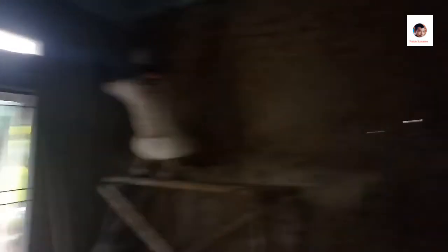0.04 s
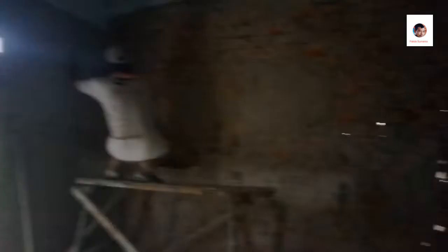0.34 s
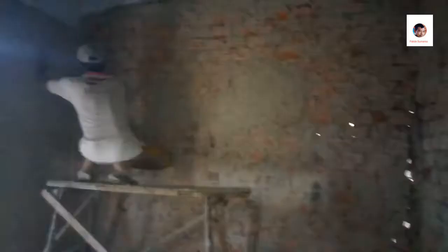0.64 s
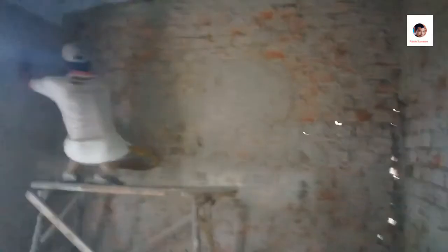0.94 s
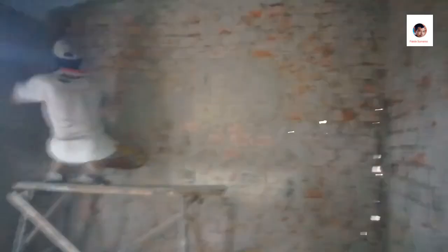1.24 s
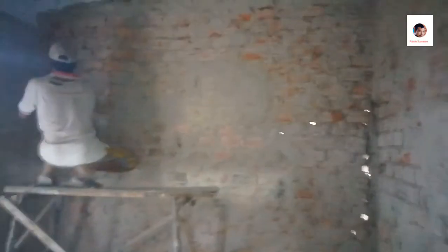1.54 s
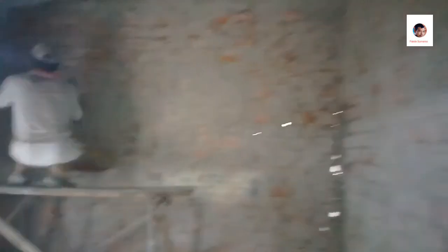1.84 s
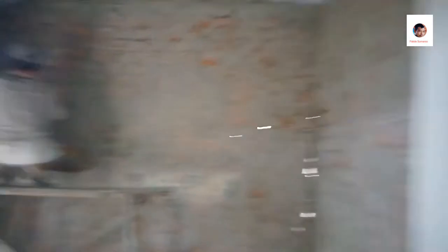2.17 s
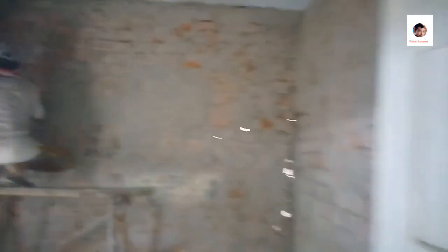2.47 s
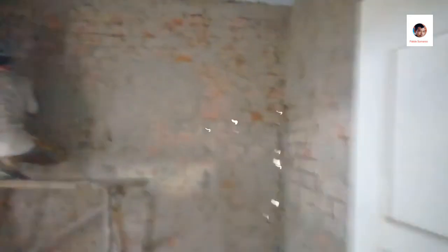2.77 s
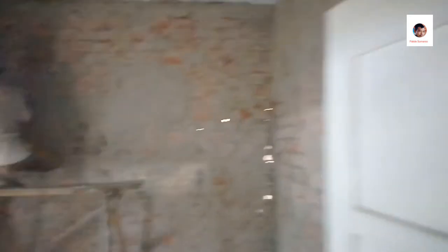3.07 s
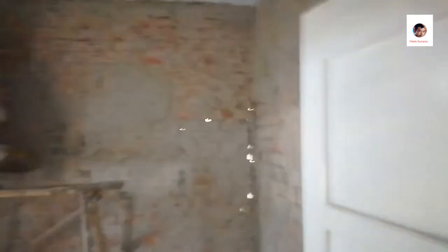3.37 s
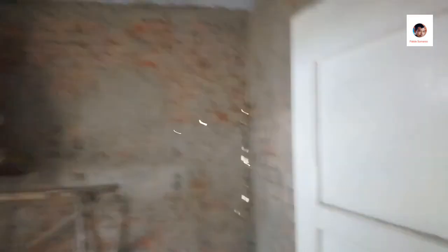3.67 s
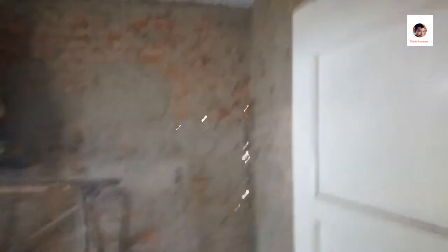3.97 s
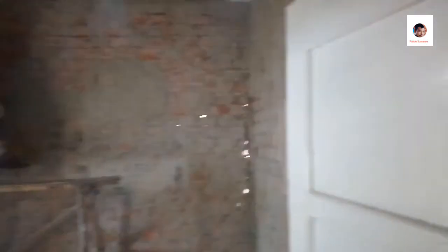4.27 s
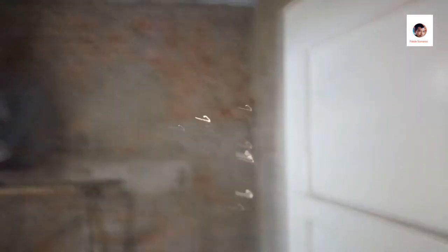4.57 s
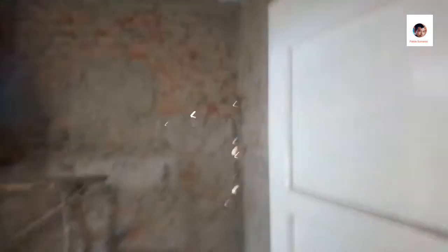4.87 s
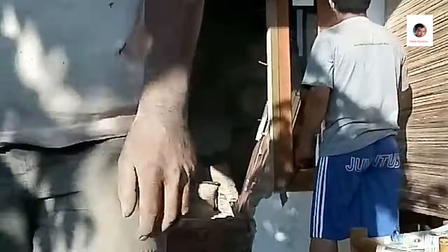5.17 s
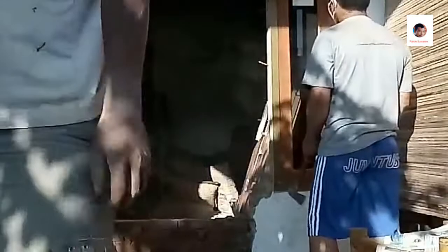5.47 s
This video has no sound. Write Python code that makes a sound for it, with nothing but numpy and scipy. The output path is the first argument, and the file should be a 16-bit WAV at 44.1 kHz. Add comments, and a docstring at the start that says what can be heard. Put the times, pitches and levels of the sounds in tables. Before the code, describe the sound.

Old plaster is being hammered off a brick wall in a bare, reverberant room, heard through dull microphones over soft room noise. Crunching, thudding hammer blows land at about 0.2 and 0.7 seconds, with louder ringing clanks on a steel chisel at 0.35 and 1.2. In a short pause, chips tick down around 1.6. From 2.0 to 4.7 the wall blows return roughly every 0.4 seconds, each with a low boom, joined by chisel strikes at 2.8, 3.7 and 4.5. Grit trickles in small spills between them, and a loose piece of masonry clacks at 4.1. At 4.8 the sound drops out for an instant. One more heavy, booming chisel blow follows at 4.9, then scattered chips land over a quieter rumble and low hum. A faint, thin whistle wavers upward from 5.1 until the end, around 5.6 seconds.

```python
"""A bare room, heard through a dull microphone pair: old plaster is being knocked off a brick wall.
Hammer blows crack the plaster and make the wall thud and boom. Between them, louder blows on a steel
chisel ring and swell; a loose piece clacks, chips land and grit trickles down.
A limiter ducks the loud blows. The sound drops out for a moment; one more heavy blow follows,
over a quieter background with a low hum and a faint rising whistle."""
import sys
import numpy as np
from scipy import signal
from scipy.fft import rfft, irfft, next_fast_len
from scipy.io import wavfile
from scipy.ndimage import uniform_filter1d, minimum_filter1d

SR = 44100
rng = np.random.default_rng(int(sys.argv[2]) if len(sys.argv) > 2 else 0)


def int16_out(signal):
    """Quantize to a 16-bit WAV file."""
    q = np.round(np.clip(np.atleast_2d(signal).T, -1, 1) * 32767)
    wavfile.write(sys.argv[1], SR, q.astype(np.int16))


N = 247709
SIZE = 32768  # samples in one impact with its tail
LONG = next_fast_len(N + SIZE, True)
T, AGE = np.arange(N) / SR, np.arange(SIZE) / SR  # seconds into the scene, and into one impact
HZ, LONG_HZ = np.fft.rfftfreq(SIZE, 1 / SR), np.fft.rfftfreq(LONG, 1 / SR)
DROPOUT_FROM_S, DROPOUT_TO_S = 4.831, 4.861

# resonances of the brick wall: f/Hz, width/Hz, level/dB
WALL_MODES = [(69.5, 15, -1.5), (125, 5.8, 3.5), (201, 65, 0.5), (281, 24, 1), (352.7, 4.2, 5.5),
              (549, 27, -3)]
# reverberation of the room by band: f/Hz, t60/s, build-up/s
ROOM_BANDS = [(60.4, 0.82, 0.054), (125, 0.9, 0.02), (269, 0.63, 0.0013), (570, 0.7, 0.00085),
              (1300, 0.72, 0.0034), (2840, 0.68, 0.017), (5600, 0.73, 0.0096), (8600, 0.3, 0.0092)]


def wall_blows(room, plate_q=14, thud_hz=105, crack_hz=4800):
    """The hammer cracks and crushes plaster, the loose plate clacks and the wall thuds and booms."""
    # blows: t/s, force/dB, hardness/(dB/octave), hollow knock/dB, thud/dB, snap/dB, crunch/dB,
    # low, middle and high plate f/Hz, plate/dB, surface crack/dB, boom f/Hz, boom/dB, after-ring/dB
    blows = [ (0.2, -15, 0.2, -1.5, 1, 1, 4.3, 2050, 4000, 5150, 7, -19, 72.1, -13.5, -24.5),
             (0.7407, -14, 0.8, 0, -2, -5, 7, 1100, 1600, 4500, 7, -12, 134.7, -20, -19),
             (2.0092, -17, -1.4, 1.5, -5.5, -10, 1.5, 870, 1790, 5500, 6, -14.5, 220, -21, -23.5),
             (2.3300, -18, 0.1, -1.5, 1, 1, 5, 1250, 2200, 6600, 6, -15, 112, -15, -17),
             (2.7731, -15.5, -1.6, 2.5, 6, 2, 5, 275, 2160, 6300, 7.7, -12, 97, -27, -37),
             (3.1300, -19.5, 1, 1, 0.5, 1.5, 5.8, 2100, 6400, 6800, 6.5, -12.5, 71, -17.5, -33.5),
             (3.483, -20, 0.84, -1.5, -3, 6.5, 2.8, 806, 1950, 3720, 9.8, -14, 68.3, -19, -30),
             (3.8500, -18.5, -1.4, 3.5, -1.5, 8, 5, 810, 1750, 4260, 5.9, -29, 63, -20, -34),
             (4.2379, -18.5, -1.2, 3, 1, 8, 7.5, 660, 4230, 6500, 8, -7, 69, -21, -33),
             (4.6620, -19.5, -0.15, 3.5, 2, 11, 6, 1236, 2120, 4500, 5.9, -17, 69, -18.5, -36)]
    # colour of an average blow on plaster: f/Hz, level/dB
    plaster_tone = [(80, 1), (200, 1.5), (460, -8.5), (1000, -12.5), (2000, -13.8), (2900, -20),
                    (3700, -19), (5600, -20.3), (8000, -18), (10500, -14), (15000, -21)]
    # broad ringing of the plaster coat: f/Hz, width/Hz, level/dB
    coat_modes = [(1450, 800, 1), (2200, 300, -1), (4250, 380, 2), (5200, 300, -2), (6700, 400, 0)]
    out, wall_db = np.zeros((2, N)), ringing(WALL_MODES)
    for (s, force_db, hardness, knock_db, thud_db, snap_db, crunch_db,
         *plate_hz, plate_db, crack_db, boom_hz, boom_db, ring_db) in blows:
        plate = [(hz, hz / plate_q, plate_db) for hz in plate_hz]
        thud = thud_db / (1 + (HZ / thud_hz) ** 4)
        modes_db = wall_db + ringing(coat_modes + plate + masonry_modes())
        colour = causal(spot_tone(plaster_tone, hardness, knock_db) + thud + modes_db)
        blow = impact(room, colour, snap_db, snap_s=0.0013,
                      crush_db=crunch_db, crush_s=0.017, window_s=0.12)
        crack = amp(crack_db) * tick(crack_hz, octaves=0.98, contact_s=0.0017)
        bass = amp(boom_db) * boom(boom_hz) + amp(ring_db) * after_ring()
        place(out, s, amp(force_db) * blow + crack + bass)
    return out


def chisel_blows(room, main_db=11, main_width_hz=140):
    """Steel on steel: a tick, clanking modes and a thin ring over the swelling knock of the brick."""
    # blows: t/s, force/dB, hardness/(dB/octave), hollow knock/dB, swell/s, bloom/dB, snap/dB,
    # clank/dB, main clank f/Hz, tick f/Hz, tick/dB, long ring/dB, wall boom/dB
    blows = [ (0.3500, -12, 2.2, 1, 0.001, -5, 8, 2.5, 2850, 6030, -9, -48, -30.5),
             (1.1802, -10, -0.8, 6.5, 0.00077, -4.5, 9.5, 0, 3050, 3560, -8, -14, -34),
             (2.8166, -10.5, 1.24, 1, 0.015, -4, -5, 5.5, 3450, 3400, -5.5, -21, -45),
             (3.6530, -9.8, -0.8, 0.5, 0.0028, -10.5, 9, 2.5, 1790, 3530, -4.5, -14, -46),
             (4.4880, -11.5, 0.2, 2.5, 0.004, -2, 2, 4, 1820, 3570, -11, -17, -35),
             (4.9110, -12.7, 0.2, 6, 0.00052, -11, 4, -6.5, 6360, 3500, -24, -45, -20.5)]
    # colour of an average blow on the chisel: f/Hz, level/dB
    chisel_tone = [(80, -0.5), (130, -2), (230, 2), (460, -2.8), (1000, -7), (1700, -14.5), (2300, -17.5),
                   (3300, -15.5), (4500, -18), (5800, -16), (10000, -16)]
    # resonances of the chisel: f/Hz, width/Hz, level/dB
    steel_modes = [(1790, 35, 10.5), (2690, 65, 12), (2790, 60, 7), (3050, 65, 9), (3200, 60, 4),
                   (3515, 90, 7), (3700, 200, 4), (4000, 120, 2), (5450, 200, 1), (5880, 300, 4),
                   (6080, 160, 4)]
    out, wall_db = np.zeros((2, N)), ringing(WALL_MODES)
    for (s, force_db, hardness, knock_db, swell_s, bloom_db, snap_db,
         clank_db, main_hz, tick_hz, tick_db, ring_db, boom_db) in blows:
        modes = steel_modes + [(main_hz, main_width_hz, main_db)]
        clank = [(hz, width, db + clank_db) for hz, width, db in modes]
        modes_db = wall_db + ringing(clank + masonry_modes())
        colour = causal(spot_tone(chisel_tone, hardness, knock_db) + modes_db)
        blow = impact(room, colour, snap_db, snap_s=0.00098,
                      crush_db=-14, crush_s=0.13, window_s=0.063, bloom=amp(bloom_db))
        knock = amp(force_db) * blow * rise(swell_s)
        contact = amp(tick_db) * tick(tick_hz, octaves=0.17, contact_s=0.0015)
        ring = amp(ring_db) * shank_ring()
        place(out, s, knock + contact + ring + amp(boom_db) * boom(hz=112, swell_s=0.078))
    return out


def impact(room, colour, snap_db, snap_s, crush_db, crush_s, window_s, grit_db=4, bloom=0):
    """A snap, a gritty crush and the spot's own reflections, at unit RMS over the first window_s."""
    bands, decay = room
    start = rng.integers(N)
    reflections = bands[:, :, start:start + SIZE]
    grit = unit(amp(grit_db * wander(SIZE, 64)))  # grains break in clumps
    crush = amp(crush_db) * grit * np.exp(-AGE / crush_s) * rise(snap_s)
    contact = amp(snap_db) * pulse(snap_s) + crush
    hz = np.array(ROOM_BANDS)[:, :1]
    direct = hz ** 2 / (hz ** 2 + 630 ** 2)  # bass reaches the microphones mostly by way of the room
    # the low-mid knock of a heavy blow swells and holds briefly
    swell = bloom * bell(hz, 443, octaves=0.65) * pulse(0.096) ** 2
    envelopes = np.sqrt(decay ** 2 + swell ** 2 + (direct * contact) ** 2)
    response = np.einsum('bcn,bn->cn', reflections, envelopes)
    sound = irfft(rfft(response) * colour)
    return sound / np.sqrt(np.mean(sound[:, :round(window_s * SR)] ** 2))


def spot_tone(shape, hardness, knock_db, tilt_from_hz=370, tilt_to_hz=3400):
    """The colour of one blow in dB: a hard spot is brighter, a hollow one knocks."""
    octaves = np.log2(np.clip(HZ, tilt_from_hz, tilt_to_hz) / tilt_from_hz)
    hollow = bell(HZ + 1, 481, octaves=0.71)
    return curve(shape, HZ) + hardness * octaves + knock_db * hollow


def masonry_modes(count=14, q=60, db=3):
    """Every spot of masonry has a few narrow resonances of its own."""
    return [(hz, hz / q, db) for hz in np.geomspace(500, 7000, count) * rng.uniform(0.9, 1.1, count)]


def tick(hz, octaves, contact_s):
    """Two hard things meet: a burst of a few milliseconds, straight to the microphones."""
    noise = rfft(rng.standard_normal((2, SIZE)))
    return unit(irfft(noise * bell(HZ + 1, hz, octaves))) * pulse(contact_s)


def boom(hz, swell_s=0.033):
    """The wall's low mode swells after the blow and is soon damped."""
    return pulse(swell_s) ** 2 * np.sin(2 * np.pi * (hz * AGE + rng.random()))


def after_ring(build_s=0.038, t60_s=0.73):
    """The wall's low modes build up and hum on after the knock."""
    # lingering modes of the wall: f/Hz, level/dB
    low_modes = [(88, -3), (127, 0), (203, -2)]
    hum = sum(amp(db) * np.sin(2 * np.pi * (hz * rng.uniform(0.97, 1.03) * AGE + rng.random()))
              for hz, db in low_modes)
    return hum * rise(build_s) * die_away(t60_s)


def shank_ring(hz=5301, beat_hz=17.5, beat_depth=0.65, build_s=0.082, t60_s=0.64):
    """The chisel's thin ring builds up; a pair of close partials beats as it dies."""
    turns = hz * AGE + rng.random((2, 1))
    pair = np.sin(2 * np.pi * turns) - beat_depth * np.sin(2 * np.pi * (turns + beat_hz * AGE))
    return unit(pair) * rise(build_s) * die_away(t60_s)


def clack(room, s=4.1437, body_db=-15, contact_db=-10):
    """A hard, loose piece of masonry is struck and rings briefly, with no boom from the wall."""
    # overall colour of the piece: f/Hz, level/dB
    piece_tone = [(100, -11), (400, -5), (900, 0.5), (2500, -3), (5000, -5.5), (6400, -3.5), (7800, -13),
                  (11000, -20.5)]
    # its resonances: f/Hz, width/Hz, level/dB
    piece_modes = [(717, 52, 10), (1060, 23, 10), (1347, 45, 11.5), (1555, 35, 11), (2310, 91, 12.5),
                   (2844, 85, 13), (3780, 140, 11.5), (4460, 70, 15), (5860, 110, 10)]
    out = np.zeros((2, N))
    colour = causal(curve(piece_tone, HZ) + ringing(piece_modes))
    body = impact(room, colour, snap_db=10, snap_s=0.0019,
                  crush_db=5, crush_s=0.038, window_s=0.095, grit_db=1.5)
    contact = tick(2600, octaves=0.39, contact_s=0.0019)
    place(out, s, amp(body_db) * body + amp(contact_db) * contact)
    return out


def chips(room):
    """Falling pieces of plaster land, each with a short tick."""
    # landings: t/s, level/dB, peak f/Hz, roll-off to both sides/(dB/octave), snap/dB
    landings = [(0.107, -32.5, 2150, 6, 18), (1.602, -31, 750, 11, 20), (1.604, -26, 4800, 5, 19),
                (1.628, -37, 2980, 4, 20), (3.112, -32, 5040, 8, 27), (3.335, -30.5, 3920, 6, 19),
                (3.412, -36.5, 5850, 12, 17), (4.026, -34.5, 4000, 6, 19), (4.074, -30.5, 3100, 2, 16),
                (4.681, -28.5, 4640, 13, 20), (4.758, -33.5, 6600, 7, 18), (5.009, -20, 7400, 12, 27),
                (5.019, -23.5, 6000, 5, 20), (5.224, -26, 7800, 10, 31), (5.247, -38, 2400, 6.5, 26),
                (5.288, -38.5, 6440, 10, 27), (5.409, -45, 6000, 4.5, 23.5), (5.4622, -34.5, 3300, 1.5, 28),
                (5.552, -37, 5220, 4, 24), (5.569, -42.5, 3500, 0.5, 25)]
    out = np.zeros((2, N))
    for s, db, hz, roll_off, snap_db in landings:
        colour = causal(-roll_off * abs(np.log2((HZ + 150) / hz)))
        chip = impact(room, colour, snap_db, snap_s=0.00066,
                      crush_db=18.5, crush_s=0.022, window_s=0.037, grit_db=-3.5)
        place(out, s, amp(db) * chip)
    return out


def crumbs(per_s=600, spread_db=5.6, clump_db=5, wet_db=7):
    """Grit trickles down: many tiny ticks of uneven size, blurred by the room."""
    # colour of the grit: f/Hz, level/dB
    grit_tone = [(100, 7), (500, 5.5), (2000, 6.1), (4000, 4.2), (6500, 3), (10000, 4.6), (15000, 6.9)]
    sizes = amp(spread_db * np.minimum(rng.exponential(1, N), 5)) * rng.choice([-1, 1], N)
    clumps = amp(clump_db * wander(N, 1800))
    grains = sizes * clumps * (rng.random(N) < per_s / SR)
    direct = unit(rng.standard_normal((2, SIZE)) * np.exp(-AGE / 0.0034))
    tail = unit(rng.standard_normal((2, SIZE)) * die_away(t60_s=0.5))
    response = rfft(direct + amp(wet_db) * tail, LONG) * amp(curve(grit_tone, LONG_HZ))
    grit = irfft(rfft(grains, LONG) * response)[:, :N]
    return unit(grit) * grit_flow()


def grit_flow(rise_s=0.23, trickle_db=-50.5, later_trickle_db=-48):
    """Gain of the falling grit: each spill swells and runs out, over a thin steady trickle."""
    # spills from the broken plaster: thickest flow t/s, level/dB, run-out time constant/s
    spills = [(0.02, -44, 0.31), (1.52, -40.5, 0.11), (2.22, -31, 0.13), (2.50, -30, 0.17),
              (3.102, -27.5, 0.17), (4.08, -30, 0.29), (4.47, -29, 0.25), (5.24, -28.5, 0.01)]
    before = T < DROPOUT_FROM_S
    flows = [amp(np.where(before, trickle_db, later_trickle_db))]
    for s, db, run_s in spills:
        envelope = np.exp(-np.maximum((s - T) / rise_s, (T - s) / run_s))
        same_side = before == (s < DROPOUT_FROM_S)  # no spill carries across the dropout
        flows.append(amp(db) * envelope * same_side)
    return np.linalg.norm(flows, axis=0)


def whistle(waver=0.018, fade_s=0.03):
    """A thin, faint whistle that wavers and rises."""
    # course of the whistle: t/s, f/Hz, level/dB
    course = [(5.11, 2420, -46), (5.19, 2420, -44.5), (5.35, 2540, -53.5), (5.46, 2580, -53.5),
              (5.61, 2630, -55)]
    s, hz, db = np.transpose(course)
    pitch = np.interp(T, s, hz) * (1 + waver * wander((2, N), 110))
    envelope = amp(np.interp(T, s, db)) * np.clip((T - s[0]) / fade_s, 0, 1)
    return unit(np.sin(2 * np.pi * np.cumsum(pitch, axis=1) / SR)) * envelope


def faint_tone(s, first_hz, last_hz, db, waver=0.018, fade_s=0.0067):
    """A wavering tone that comes in at s and glides until the end."""
    pitch = np.interp(T, [s, T[-1]], [first_hz, last_hz]) * (1 + waver * wander(N, 300))
    envelope = amp(db) * np.clip((T - s) / fade_s, 0, 1)
    return unit(np.sin(2 * np.pi * np.cumsum(pitch) / SR)) * envelope


def room_tone(rumble_db=-43):
    """Room noise up to the dropout; after it a low rumble with a hum and a short hoot."""
    # spectrum of the room noise: f/Hz, level/dB
    noise_tone = [(25, 2.5), (65, -2.5), (125, -4), (250, -8.5), (450, -12.5), (850, -6.5), (1400, -13),
                  (2100, -8.5), (3500, -15.5), (6500, -12.5), (9500, -14.5)]
    # its slow changes in loudness: t/s, level/dB
    noise_levels = [(0, -31.5), (.7, -37), (1.5, -32), (1.95, -39), (2.7, -35), (3.3, -32.5), (4.8, -31.5)]
    # spectrum of the rumble: f/Hz, level/dB
    rumble_tone = [(25, 11), (45, 22), (65, 18.5), (100, 17), (130, 20.5), (180, 7), (320, 9), (700, -19),
                   (2000, -5), (2600, -6), (3500, -7), (5600, 2), (6800, 3), (8000, -2), (10000, 2),
                   (15000, -2)]
    # the hum and the hoot: start t/s, first f/Hz, last f/Hz, level/dB
    tones = [(4.86, 103.4, 106.1, -46.5), (5.579, 358, 366, -49)]
    noise, rumble = (unit(irfft(diffuse_field() * amp(curve(shape, LONG_HZ)))[:, :N])
                     for shape in (noise_tone, rumble_tone))
    before = noise * amp(np.interp(T, *np.transpose(noise_levels)))
    after = amp(rumble_db) * rumble + sum(faint_tone(*row) for row in tones)
    return np.where(T < DROPOUT_FROM_S, before, after)


def room_reflections():
    """Dense reflections split in bands, and the rise and fall of each band."""
    hz, t60_s, build_s = np.transpose(ROOM_BANDS)
    field = diffuse_field()
    weights = [curve(np.transpose([hz, band]), LONG_HZ) for band in np.eye(len(hz))]
    bands = np.array([irfft(field * weight) for weight in weights])
    return bands, die_away(t60_s[:, None]) * rise(build_s[:, None])


def diffuse_field():
    """Spectrum of white noise at the two microphones: alike in the bass, unrelated in the treble."""
    # likeness of left and right: f/Hz, coherence
    coherence = [(100, 0.99), (240, 0.95), (470, 0.76), (940, 0.097), (1800, -0.15), (3700, -0.15),
                 (7400, 0.11)]
    left, other = rfft(rng.standard_normal((2, LONG)))
    same = curve(coherence, LONG_HZ)
    return np.array([left, same * left + np.sqrt(1 - same ** 2) * other])


def place(mix, s, sound, dip_s=2.799, dip_db=-13):
    """Adds a sound at s; a tail is damped if it rings past dip_s, and does not outlast the dropout."""
    end = round(DROPOUT_TO_S * SR) if s < DROPOUT_FROM_S else N
    damping = amp(dip_db * np.clip((s + AGE - dip_s) / 0.004, 0, 1) * (s < dip_s))
    part = mix[:, round(s * SR):end][:, :SIZE]
    part += (sound * damping)[:, :part.shape[1]]


def ringing(modes):
    """The rise in dB that damped modes give to a flat spectrum."""
    power = sum(amp(db) ** 2 / (1 + (2 * (HZ - hz) / width) ** 2) for hz, width, db in modes)
    return 10 * np.log10(1 + power)


def causal(db):
    """The minimum-phase filter with this gain: nothing sounds ahead of a blow."""
    cepstrum = irfft(np.log(amp(db)))
    half = len(cepstrum) // 2
    cepstrum[1:half] *= 2
    cepstrum[half + 1:] = 0
    return np.exp(rfft(cepstrum))


def curve(points, hz):
    """Joins (f/Hz, value) points by straight lines on a log frequency axis."""
    f, value = np.transpose(points)
    return np.interp(np.log(hz + 1), np.log(f + 1), value)


def bell(hz, centre_hz, octaves):
    """A Gaussian band on a log frequency axis."""
    return np.exp(-0.5 * (np.log2(hz / centre_hz) / octaves) ** 2)


def wander(shape, samples):
    """Noise smoothed over this many samples, at unit RMS."""
    return unit(uniform_filter1d(rng.standard_normal(shape), size=samples))


def pulse(peak_s):
    """An envelope that reaches 1 at peak_s and falls away."""
    return AGE / peak_s * np.exp(1 - AGE / peak_s)


def rise(build_s):
    return 1 - np.exp(-AGE / build_s)


def die_away(t60_s):
    return amp(-60 * AGE / t60_s)


def amp(db):
    return 10 ** (np.asarray(db) / 20)


def unit(x):
    return x / np.sqrt(np.mean(x ** 2) + 1e-20)


def limiter(x, ceiling_db=-2.5, ahead_s=0.009, recovery_db_per_s=150):
    """Looks ahead for bursts of power, ducks just before them and recovers over the tail."""
    power = uniform_filter1d(x ** 2, size=4, axis=1).max(0)
    over_db = np.maximum(10 * np.log10(abs(power) + 1e-12) - ceiling_db, 0)
    ahead = 2 * round(ahead_s * SR / 2) + 1
    coming_db = -minimum_filter1d(-over_db, ahead, origin=-(ahead // 2))
    recovery_db = recovery_db_per_s * T
    duck_db = np.maximum.accumulate(coming_db + recovery_db) - recovery_db
    return x * amp(-uniform_filter1d(duck_db, size=128))


def scene():
    """The work on the wall, the falling debris and the background, as they reach the microphones."""
    room = room_reflections()
    work = wall_blows(room) + chisel_blows(room) + clack(room)
    debris = chips(room) + crumbs()
    return work + debris + room_tone() + whistle()


def record(dry):
    """A dull microphone pair, duller on the right; then the limiter, the dropout and the band limit."""
    # response of the microphones: f/Hz, level/dB
    response = [(25, -6.5), (45, -5.5), (62, 4), (6800, -3), (7550, -14), (8300, -26), (10500, -32.5),
                (13500, -46), (15000, -43)]
    # right microphone against the left: f/Hz, level/dB
    right_offset = [(500, -1), (1500, -1), (2500, -2.5), (4200, -5), (5500, -12.5), (7000, -15.5),
                    (10000, -2.5)]
    dropout_db, edge_hz = -27, 15800
    left_db = curve(response, LONG_HZ)
    pair = np.array([causal(left_db), causal(left_db + curve(right_offset, LONG_HZ))])
    heard = limiter(irfft(rfft(dry, LONG) * pair)[:, :N])
    in_dropout = (T > DROPOUT_FROM_S) & (T < DROPOUT_TO_S)
    gain = uniform_filter1d(amp(dropout_db * in_dropout), size=64)
    lowpass = signal.firwin(511, edge_hz, window=("kaiser", 9), fs=SR)
    return signal.oaconvolve(heard * gain, lowpass[None], "same")


dry = scene()
out = record(dry)
int16_out(out)
```